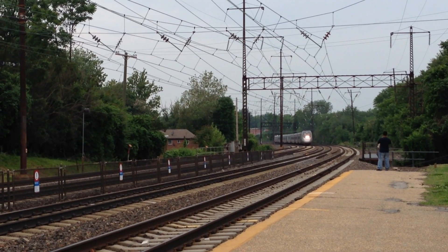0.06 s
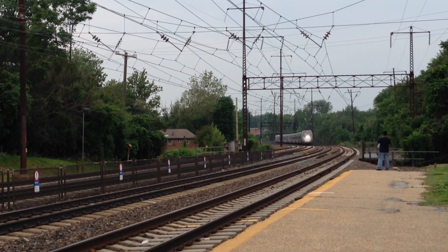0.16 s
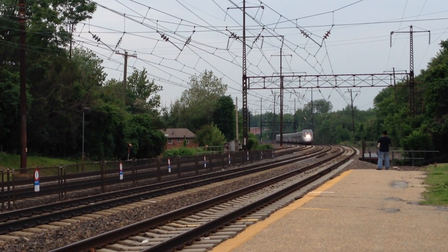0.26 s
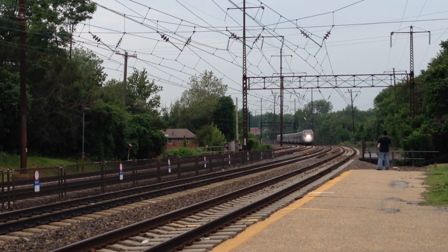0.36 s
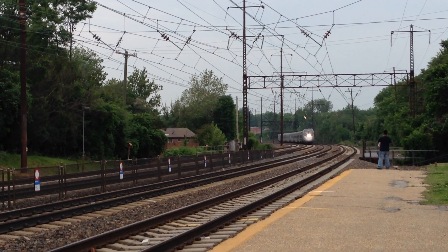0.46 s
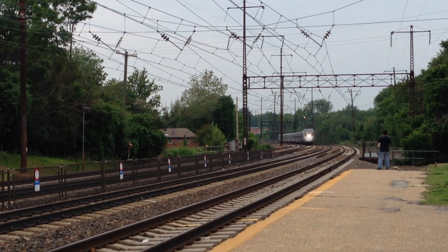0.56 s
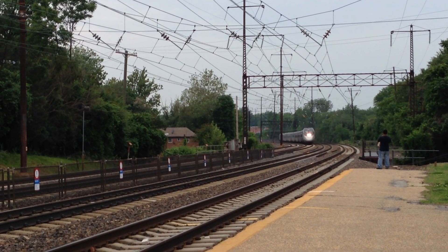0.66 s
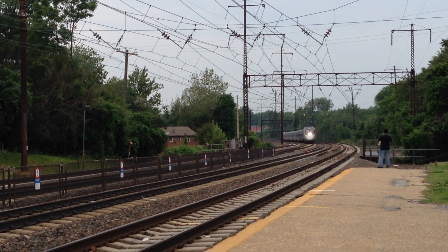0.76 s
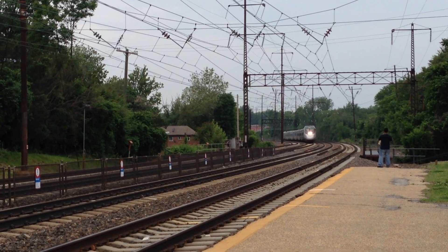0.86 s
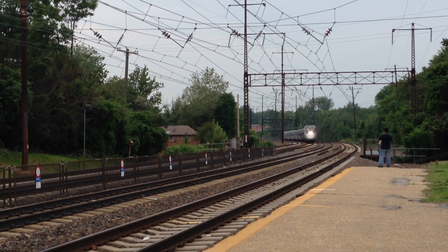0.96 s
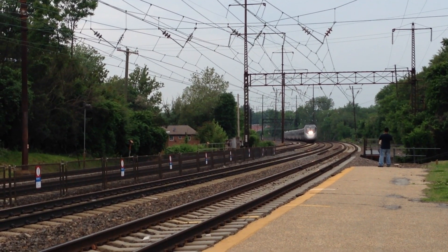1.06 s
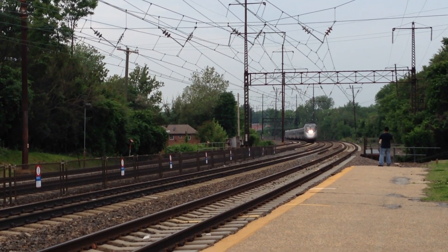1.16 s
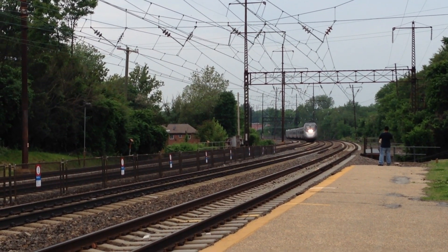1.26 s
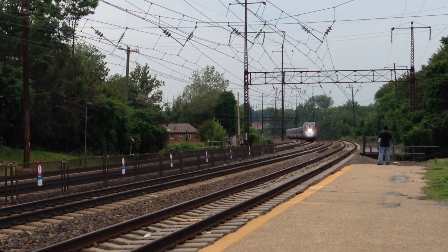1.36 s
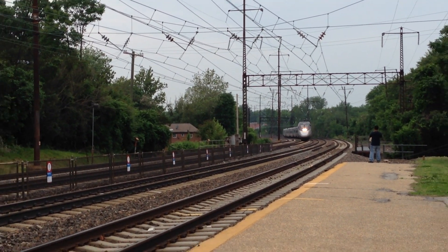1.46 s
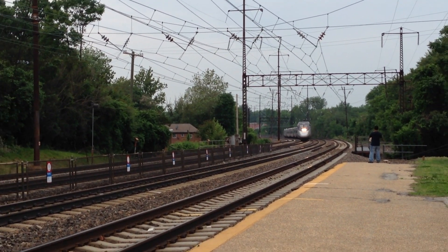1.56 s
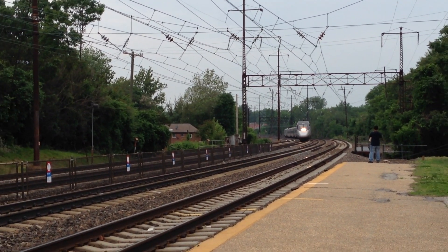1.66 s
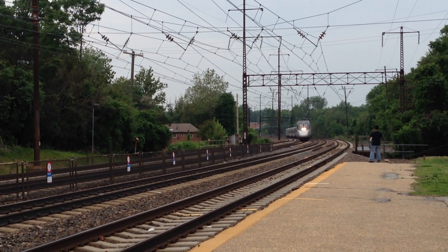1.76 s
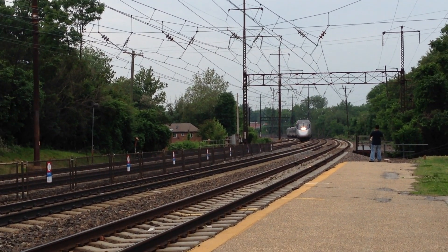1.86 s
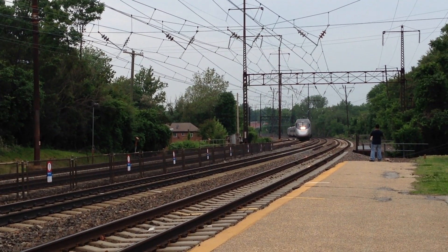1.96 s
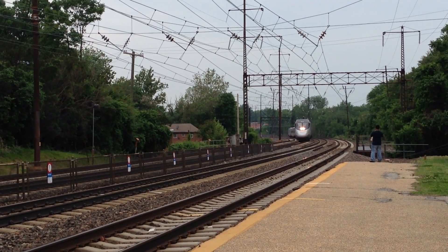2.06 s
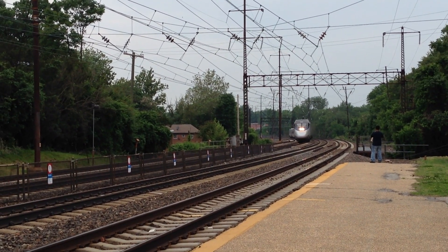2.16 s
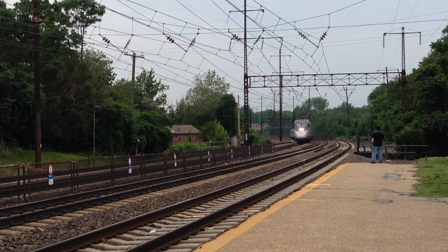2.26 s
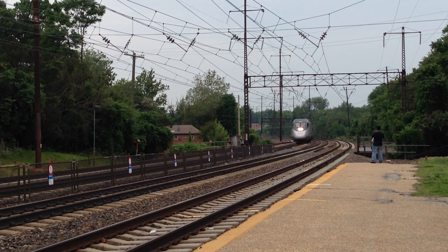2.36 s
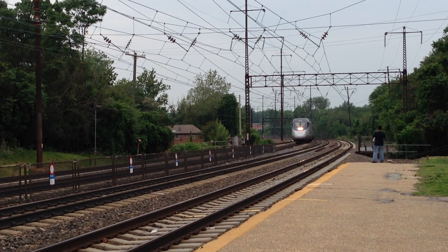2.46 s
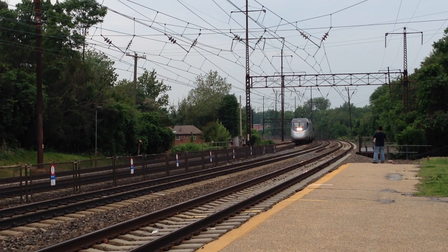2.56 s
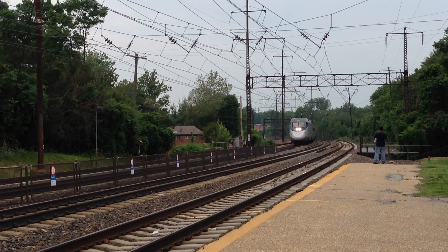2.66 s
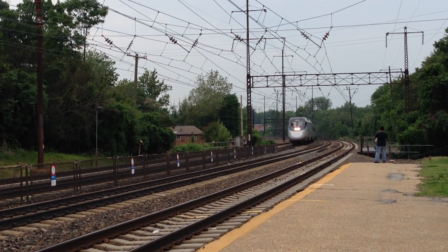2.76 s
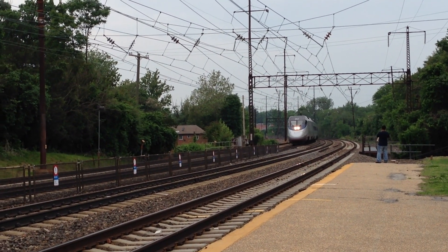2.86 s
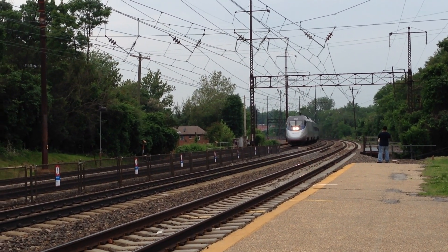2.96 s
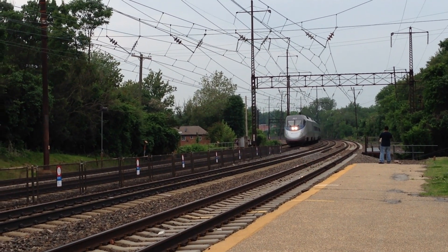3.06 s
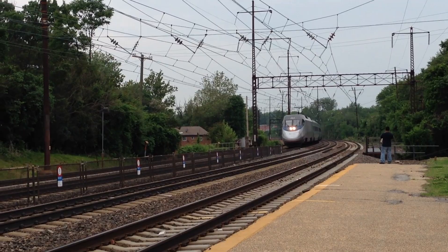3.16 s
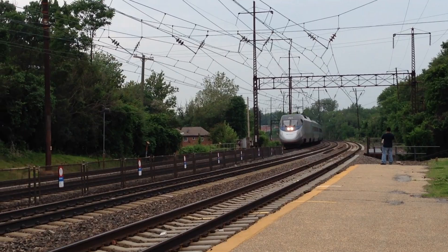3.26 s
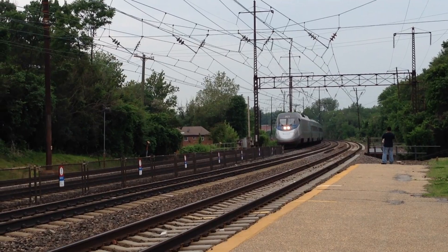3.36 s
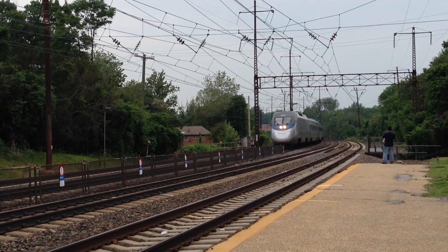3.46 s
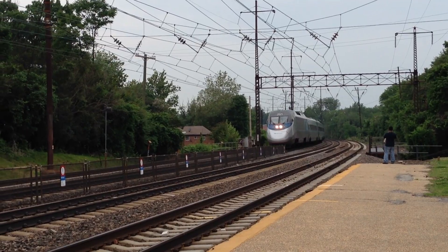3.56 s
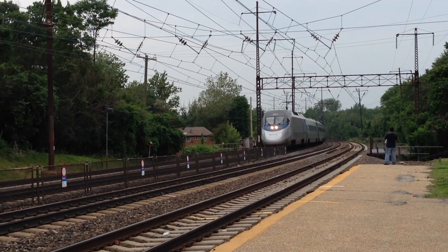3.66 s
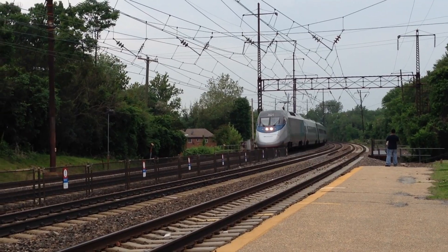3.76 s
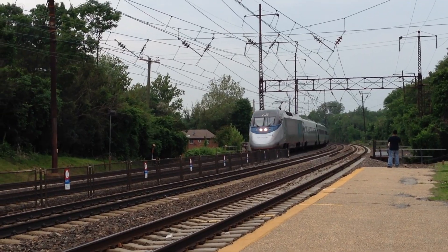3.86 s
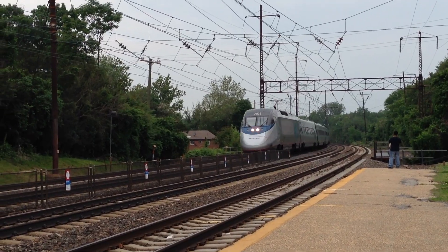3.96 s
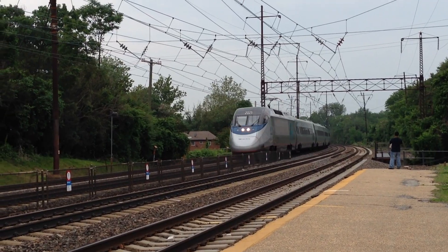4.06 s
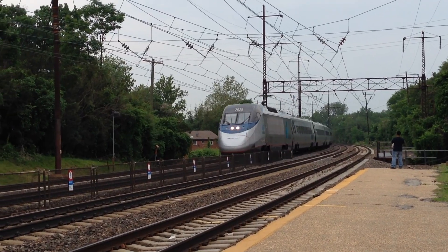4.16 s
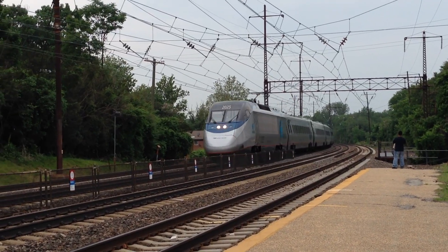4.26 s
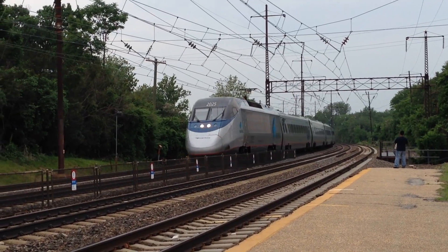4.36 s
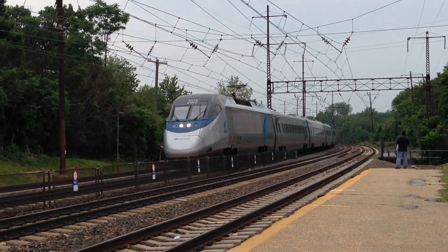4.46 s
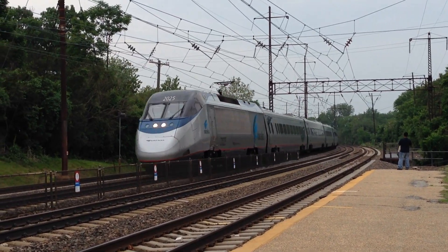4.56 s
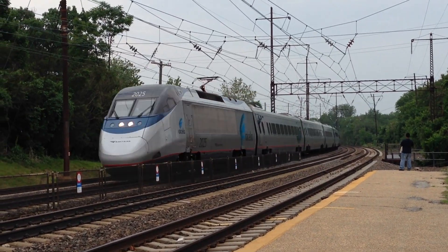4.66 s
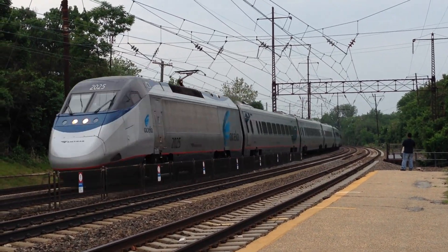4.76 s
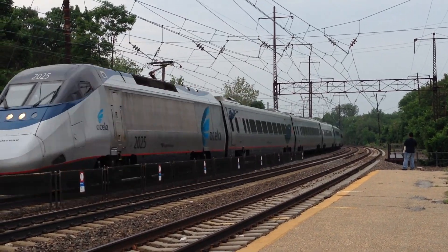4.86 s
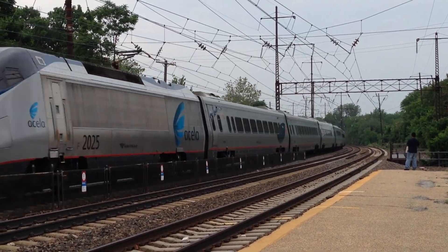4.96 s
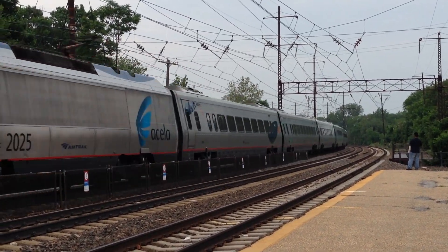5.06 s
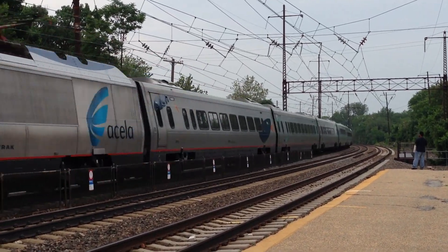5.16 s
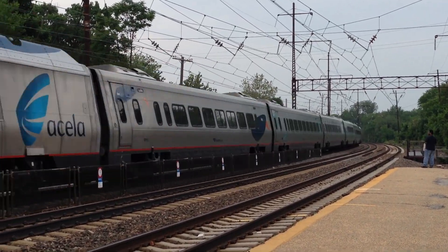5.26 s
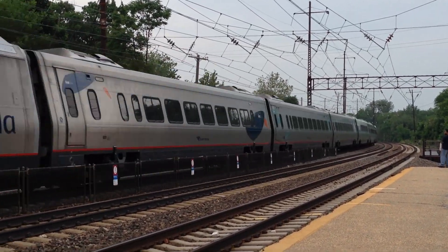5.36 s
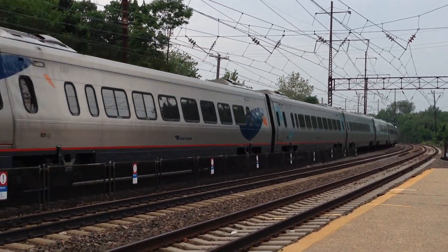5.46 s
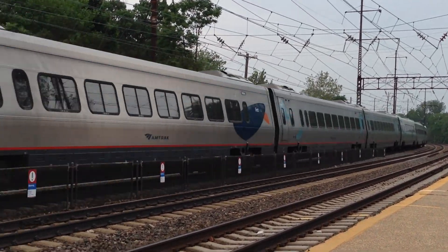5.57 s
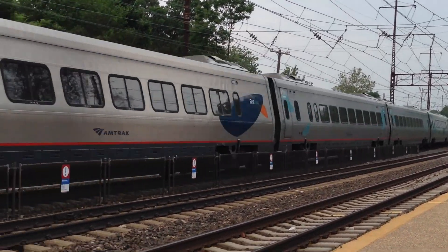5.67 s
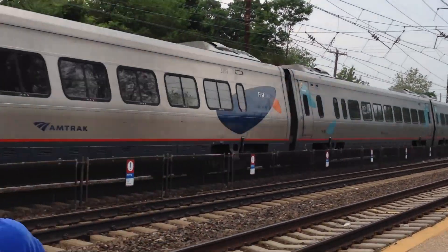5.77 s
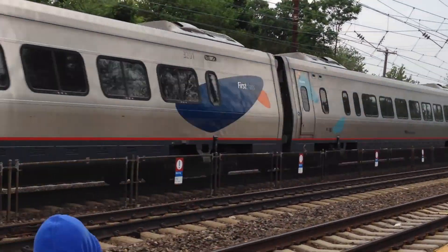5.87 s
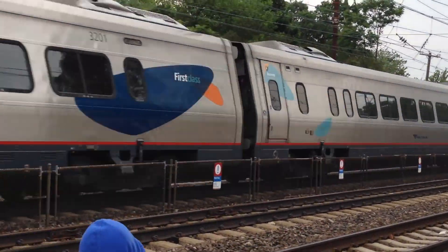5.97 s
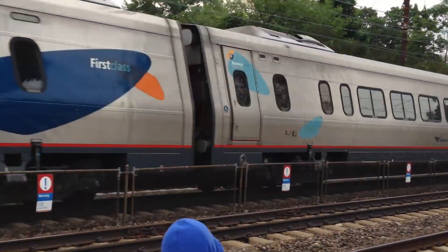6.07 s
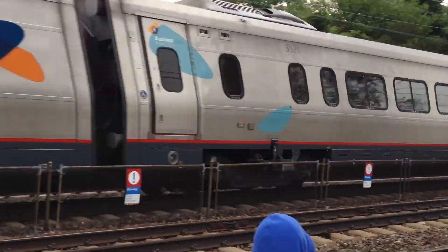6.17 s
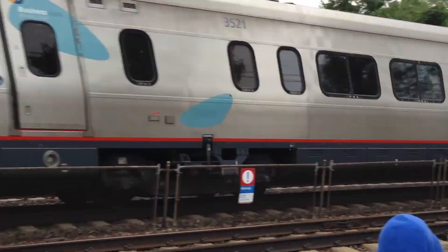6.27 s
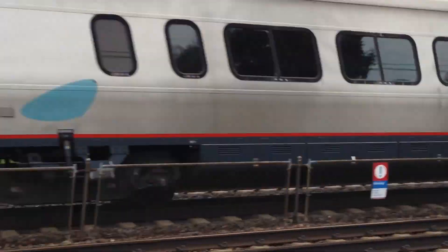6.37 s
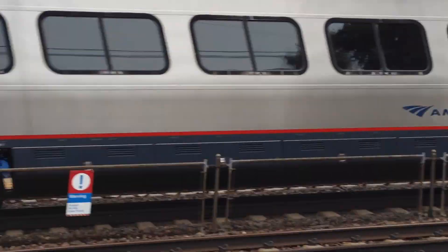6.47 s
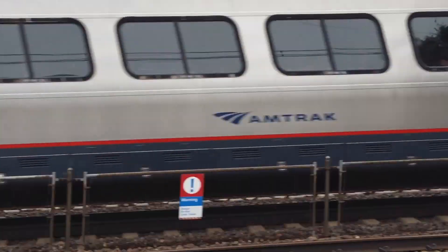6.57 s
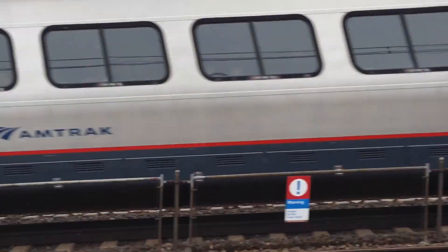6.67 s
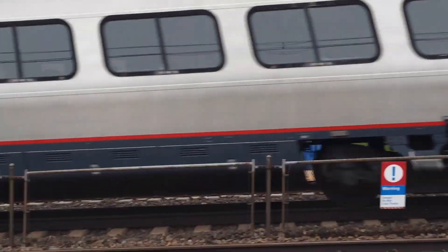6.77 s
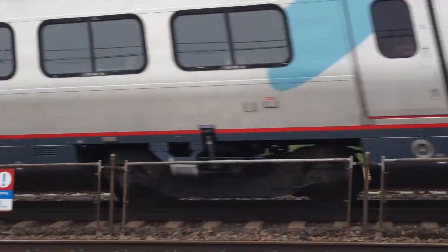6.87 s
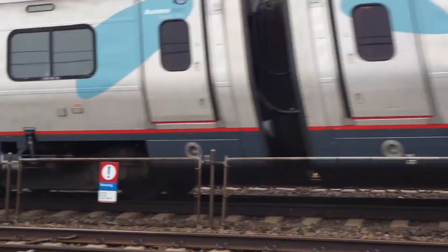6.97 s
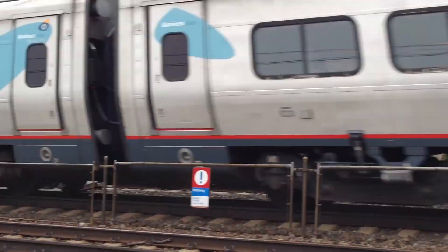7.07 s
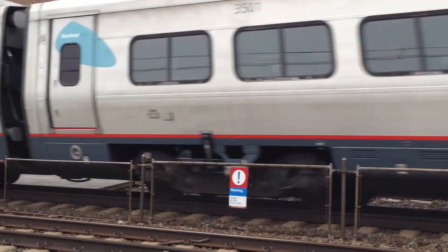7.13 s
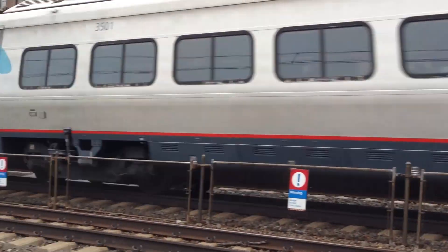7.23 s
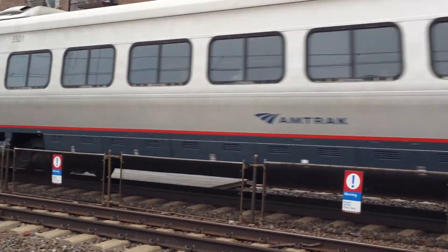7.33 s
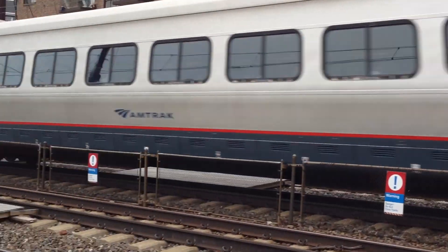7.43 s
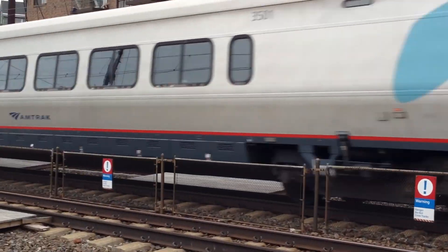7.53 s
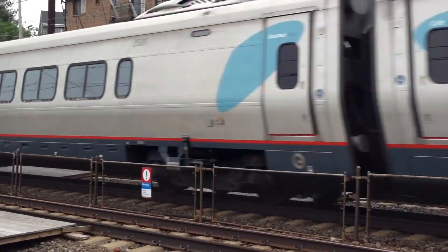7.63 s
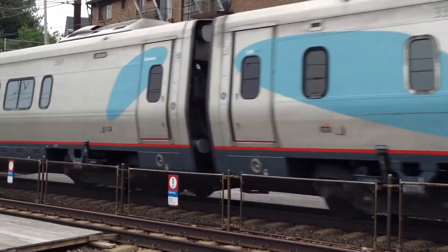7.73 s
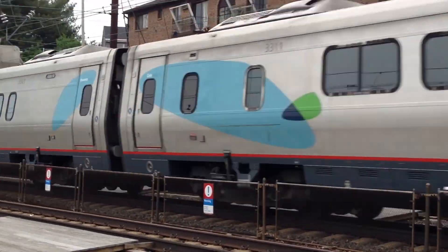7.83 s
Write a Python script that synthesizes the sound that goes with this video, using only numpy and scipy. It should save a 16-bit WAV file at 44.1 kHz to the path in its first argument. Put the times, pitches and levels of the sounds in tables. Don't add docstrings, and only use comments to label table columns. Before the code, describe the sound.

Outdoors on a railway platform, a very faint low rumble and a few husky sparrow chirps. From about three seconds the train swells, with thin rail singing and tiny electric spits. Near five seconds two very short brassy horn barks sound, then a loud broadband roar of wheels, motors and wind fills the close single microphone, pulsing as each wheel set passes until the end.

```python
import sys
import numpy as np
from scipy import signal
from scipy.fft import rfft, irfft, next_fast_len
from scipy.io import wavfile
from scipy.ndimage import uniform_filter1d, map_coordinates

SR = 44100
rng = np.random.default_rng(int(sys.argv[2]) if len(sys.argv) > 2 else 0)


def store_pcm(level_fs):
    pcm = np.round(np.clip(level_fs, -1, 1) * 32767).astype(np.int16)
    wavfile.write(sys.argv[1], SR, np.atleast_2d(pcm).T)


def makeup_ratio(level_db):
    decades = np.asarray(level_db, float) / 20
    return 10 ** decades


N = 348390
HOP = 256

# t/s, stage (0 far, 1 close ahead, 2 power car alongside, 3 coaches alongside)
NEARNESS = [
    (0, 0),
    (2.5, 0.58),
    (4.3, 1),
    (4.8, 1.3),
    (5.3, 2.5),
    (5.75, 2.5),
    (6.15, 3),
    (7.9, 3),
]
# t/s, level/dB
LOUDNESS = [(0, -48.5), (1, -48.5), (1.6, -48), (2.7, -44), (3.3, -40), (3.45, -40.5), (3.72, -36.5),
            (3.95, -37.5), (4.6, -31), (4.8, -27), (5.27, -23), (5.5, -19), (5.8, -22), (6.7, -21.5),
            (7.0, -20), (7.9, -22.5)]
# f/Hz, level/dB (per Hz)
RUMBLE = [
    [(12, -62), (20, -28), (48, -5), (70, 2), (98, -14), (150, -21), (200, -26), (330, -120)],
    [(12, -45), (20, -15), (51, 0), (70, -2), (103, -12), (150, -1), (200, -23), (330, -120)],
    [(12, -52), (20, -24), (70, -1), (108, -12), (150, -1), (200, -17), (330, -120)],
    [(12, -51), (20, -22), (70, 0), (86, 4), (108, -37), (150, -4), (200, 2), (330, -120)],
]
ROLLING = [
    [(71, -43), (120, -20), (205, -3), (345, -9), (414, -14), (558, -25.5), (588, -10), (644, -28), (688, -21.5), (904, -14), (1130, -22), (1830, -14.5), (2700, -28.5), (3510, -64), (5940, -120)],
    [(71, -41), (120, -11), (184, 3.5), (242, -8), (336, 0.5), (436, -10.5), (523, -14.5), (814, -1.5), (1200, -1), (1540, -6), (1920, -3.5), (2370, -9.5), (2700, -26), (3510, -52), (5940, -120)],
    [(71, -37), (120, -6.5), (252, -7.5), (378, 1.5), (636, -6.5), (1140, -3.5), (1250, -4.5), (1920, -12), (2700, -14), (3510, -49), (5940, -120)],
    [(71, -42), (120, -6), (168, 0.5), (252, -1.5), (425, -1.5), (644, -5), (1040, -0.5), (1580, -2.5), (2050, -2.5), (2430, -11.5), (2700, -11.5), (3510, -65), (5940, -120)],
]
HISS = [
    [(1530, -22), (2600, -24), (2860, 2.5), (5120, -4.5), (5660, -6.5), (6670, -16), (7300, -31), (9490, -42), (16100, -120)],
    [(1530, -19), (2600, -8), (3040, -3), (3690, -3), (4160, -6), (5140, -7.5), (7300, -14.5), (9490, -42), (16100, -120)],
    [(1440, -28), (2450, -8), (3360, 0.5), (3940, -1), (7300, -20), (9490, -43), (16100, -120)],
    [(1440, -51), (2450, -13.5), (2730, 4.5), (3040, 0.5), (5730, -3), (7300, -11), (9490, -30), (16100, -120)],
]
AIR = [
    [(5500, -60), (6800, -5), (8500, -9), (11000, -7), (11800, -2), (12600, 2), (14000, 1), (15200, -5)],
    [(4500, -48), (6800, -10), (8000, -3), (9000, 0), (11800, -6), (13800, -5), (15200, -18)],
    [(4000, -12), (6800, -3), (12700, -19), (15100, -29)],
    [(4000, -20), (6800, -2.5), (10200, -5.5), (14200, -14), (15100, -16)],
]
RUMBLE_DB = [-15.5, -16.5, -16.5, -15]
HISS_DB = [-17, -12.5, -9.5, -9.5]
AIR_DB = [-18.5, -22, -25.5, -16.5]
# t/s, swell/dB
BOGIES = [(5.55, 2), (6.07, 1), (6.37, 1.5), (6.57, 1.5), (6.92, 2), (7.17, 0), (7.4, 1.5), (7.77, 1)]
BOGIE_S, BOGIE_HISS, BOGIE_AIR = 0.048, 0.49, 0.33
# t/s, half length/s, level/dB
THUDS = [(1.52, 0.044, 13), (4.16, 0.087, 7), (4.5, 0.42, 6.5), (4.95, 0.11, 2.5), (5.28, 0.045, 8),
         (5.65, .1, 8), (5.92, 0.1, 5), (6.9, 0.35, 6.5), (7.15, .06, -5), (7.57, 0.055, 5),
         (7.81, 0.047, 12)]
# t/s, half length/s, level/dB
PUFFS = [(3.0, .05, -1), (3.3, .05, 2), (3.75, .12, 2), (4.15, 0.13, 5.5), (4.39, 0.086, 6.5),
         (5.19, 0.042, 0.5), (5.35, 0.06, 0), (5.85, .06, 3.5), (6.1, 0.14, -3), (6.47, 0.077, 1.5),
         (6.87, .08, 1.5)]

# f/Hz, delay on the first blast/s, level/dB in first blast, second blast and echo
BELLS = [
    (375, 0.09, -24, -20.5, -30.5),
    (461.6, 0.0024, -21, -20.5, -50),
    (580.5, 0.0066, -20.5, -19.5, -30.5),
    (624, -0.0071, -26, -36, -55),
    (538, 0.071, -30, -29.5, -47),
]
PARTIALS = [
    [-6, 2, -26, -10.5, -17, -19],
    [-11, 1, -11, -7, -11.5, -41],
    [-2, -4, -22, -24, -35, -30],
    [3, 3, 3.5, -19, -17, -29],
    [1, -1, -12, -19, -28, -25],
]
LEAN = [20, -30, 30, -170, 10]
# t/s, length/s, pitch factor, brassy top level/dB, rushing air level/dB
BLASTS = [
    (4.826, 0.069, 0.98, -17.5, -21.5),
    (4.978, 0.073, 0.98, -21.5, -26.5),
    (5.087, 0.11, 0.92, -60, -34),
]
# t/s, level/dB (per partial)
FACING = [(4.82, -1), (4.9, 3), (4.95, -2.2), (5.02, 0.7), (5.07, -0.5), (5.1, -3), (5.3, -9)]
# f/Hz, level/dB (per Hz)
BRASS = [
    [(1470, -14), (2500, 2), (3780, 2), (3870, 1), (4180, 1), (4980, 3), (7500, -19), (9750, -42), (16500, -120)],
    [(3820, -26), (6500, -5), (7330, -1), (8610, -5), (10900, -7.5), (15100, -22)],
]
# f/Hz, level/dB (per Hz)
THROAT = [(200, -46), (330, 0), (550, 1.5), (900, -0.5), (1300, -2), (1900, -1), (2400, -1), (2800, -45)]
ATTACK_S, RELEASE_T60, BRASS_T60 = 0.012, 0.22, 0.43
BUILD_DB, SPARKLE_DB = 7.5, -8.5
SAG_PER_S, SAG_POWER, MIDDLE_HZ = .21, 4, 475.6

# (t/s, length/s, f/Hz, level/dB)
SINGING = [
    (397, 0, 2, [(2.75, 0.44, 8900, -76), (3.1, 0.89, 8900, -65.5), (4.0, .9, 8860, -62)]),
    (160.4, 0.36, 3.2, [(5.28, 0.45, 1203, -26), (5.72, 0.25, 1030, -27)]),
    (648, .25, 3.5, [(5.15, 0.64, 3546, -35), (5.55, 0.31, 3300, -29.5)]),
    (238, .35, 4.6, [(5.66, 0.42, 1658, -26.5)]),
    (301, .15, 5.8, [(5.95, 0.14, 1980, -31), (6.28, .2, 2100, -27), (6.79, 0.48, 2105, -24.5), (7.15, 0.27, 2037, -26), (7.4, .24, 1890, -25), (7.56, .48, 1972, -26.5)]),
    (16, 0.038, 1.2, [(5.3, 1.9, 80, -37.5), (7.3, 0.86, 82.2, -36.5)]),
    (70, .1, 1.8, [(5.38, 0.3, 172.6, -30), (5.7, 0.24, 172, -33), (6.1, 0.39, 165.6, -34.5), (7.45, 0.18, 165, -31), (7.68, 0.14, 171.8, -31.5)]),
]
SWELL_SHARE = 0.15
# t/s, peak level/dB, t60/s
SPARKS = [
    (2.834, -48, .012),
    (3.745, -52, .08),
    (4.385, -41, .05),
    (5.804, -26, 0.25),
]
# t/s, f/Hz, level/dB
CHIRP = [(-.018, 6300, -20), (-.006, 5600, -3), (0, 4000, -18), (.008, 4600, 4), (.017, 5350, -4),
         (.046, 4450, -3), (.055, 3500, 0), (.083, 3280, -3.5), (.105, 3800, -16)]
# t/s, level/dB, pitch factor, length factor
SPARROW = [
    (.19, -60.5, 1.01, 1.01),
    (1.11, -56.5, 1.02, 0.92),
    (1.95, -55, 1.01, .9),
    (2.7, -57, 0.97, 1.07),
]

# t/s, level/dB
SPLITS = [(3.27, -73), (3.76, -56), (3.87, -65), (4.25, -56), (4.53, -57), (4.575, -60), (5.71, -47),
          (7.57, -35)]
# f/Hz, level/dB
SEAM = [(2560, -40), (2610, 0), (2710, 0), (2760, -40)]
# f/Hz, level/dB
LOW_CUT = [(15, -24), (30, -18), (45, 0.5), (65, 0)]


def train():
    rolling_db, near = curves(LOUDNESS)[0], curves(NEARNESS)[0]

    def layer_db(stages_db):
        return rolling_db + np.interp(near, np.arange(len(stages_db)), stages_db)

    axles = wobble(9.8) * (0.27 + 0.2 * near)
    bogies = swells([(s, BOGIE_S, db) for s, db in BOGIES])
    rumble_db = layer_db(RUMBLE_DB) + swells(THUDS)
    wheels_db = rolling_db + bogies + 0.26 * axles
    hiss_db = layer_db(HISS_DB) + BOGIE_HISS * bogies + 0.4 * axles
    air_db = layer_db(AIR_DB) + BOGIE_AIR * bogies + swells(PUFFS) + 0.22 * axles + 0.56 * wobble(23)
    return (makeup_ratio(rumble_db) * roar(RUMBLE, patchy_db=-0.8)
            + makeup_ratio(wheels_db) * roar(ROLLING, patchy_db=1.66)
            + makeup_ratio(hiss_db) * roar(HISS, patchy_db=1.5)
            + makeup_ratio(air_db) * roar(AIR, patchy_db=0.5))


def roar(spectra, patchy_db):
    sizes = dict(nperseg=4 * HOP, noverlap=3 * HOP)
    hz, t, z = signal.stft(rng.standard_normal(N + 4 * HOP), SR, **sizes)
    place = curves(NEARNESS, t)[0]
    share = np.clip(1 - np.abs(place - np.arange(len(spectra))[:, None]), 0, 1)
    gain = makeup_ratio(np.transpose([along(s, hz) for s in spectra]) @ share)
    gain = gain / np.sqrt(np.mean(gain ** 2, axis=0))
    patches = uniform_filter1d(rng.standard_normal(z.shape), size=7, axis=0)
    patches = unit(uniform_filter1d(patches, size=14, axis=1))
    return unit(signal.istft(z * gain * makeup_ratio(patchy_db * patches), **sizes)[1][:N])


def horn():
    first, t, on = span(FACING, .02)
    tones, fronts = bells(t)
    return gate(on * (tones + brassy_top(t, fronts) + rushing_air(t)), first)


def bells(t):
    tones, fronts = np.zeros(len(t)), np.zeros(len(t))
    starts, lengths, factors, *_ = np.transpose(BLASTS)
    which = np.maximum(np.searchsorted(starts, t) - 1, 0)
    doppler = uniform_filter1d(factors[which], size=500)
    since = uniform_filter1d(t - starts[which], size=500)
    tilt_db = curves(FACING, t)[0]
    for (hz, late, *levels_db), partials, lean in zip(BELLS, PARTIALS, LEAN):
        blows = []
        for s, d, db in zip(starts + [late, 0, 0], lengths, levels_db):
            lean_db = lean * np.clip(t - s - d / 2, -.05, .05)
            blows.append(makeup_ratio(db + lean_db) * blast(t, s, d))
        level = np.max(blows, axis=0)
        sag = 1 - SAG_PER_S * (hz / MIDDLE_HZ) ** SAG_POWER * since
        shake = 1 + .013 * wobble(70, len(t))
        phase = 2 * np.pi * np.cumsum(hz * doppler * sag * shake) / SR
        for k, part_db in enumerate(partials, 1):
            flutter_db = 2.8 * wobble(55, len(t))
            part = makeup_ratio(part_db + (k - 2.5) * tilt_db + flutter_db)
            tones += level * part * np.sin(k * phase + k * k)
        fronts += level * signal.sawtooth(phase)
    return tones, fronts


def brassy_top(t, fronts):
    blows = []
    for s, d, _, db, _ in BLASTS:
        build_db = -BUILD_DB * np.clip(1 - (t - s) / d, 0, 1)
        blows.append(makeup_ratio(db + build_db) * blast(t, s, d, BRASS_T60))
    edge = np.gradient(fronts)
    edge = edge / np.sqrt(np.abs(uniform_filter1d(edge ** 2, size=900)) + 1e-12)
    buzz = edge + 1.5 * rng.standard_normal(len(t))
    brass, sparkle = (unit(coloured(buzz, s)) for s in BRASS)
    return makeup_ratio(-8.5) * np.max(blows, axis=0) * (brass + makeup_ratio(SPARKLE_DB) * sparkle)


def rushing_air(t):
    level = np.max([makeup_ratio(db) * blast(t, s, d) for s, d, _, _, db in BLASTS], axis=0)
    return level * unit(coloured(rng.standard_normal(len(t)), THROAT))


def blast(t, s, length, t60=RELEASE_T60):
    return np.clip((t - s) / ATTACK_S, 0, 1) * makeup_ratio(-60 * np.clip(t - s - length, 0, None) / t60)


def singing():
    out = np.zeros(N)
    for width_hz, slide, burst_db, rows in SINGING:
        for s, length, start_hz, db in rows:
            first, t, _ = span([(s,), (s + length,)], 0.000992)
            on = np.clip(np.minimum(t - s, s + length - t) / (SWELL_SHARE * length), 0, 1) ** 2
            keep = np.exp(-np.pi * width_hz / SR)
            drive = rng.standard_normal((len(t), 2)) @ [1, 1j]
            fuzz = signal.lfilter([1], np.poly([keep, keep]), drive)
            stray = .35 * width_hz * np.tanh(3 * wobble(45, len(t)))
            bursts = makeup_ratio(burst_db * wobble(70.1, len(t)))
            hz = start_hz * (1 - slide * (t - s)) + stray
            carrier = np.exp(2j * np.pi * np.cumsum(hz) / SR)
            out += gate(on * makeup_ratio(db + 3.5) * np.real(unit(fuzz * bursts) * carrier), first)
    return out


def sparks():
    out, t = np.zeros(N), np.arange(SR // 8) / SR
    for s, db, t60 in SPARKS:
        out[round(s * SR):][:len(t)] += makeup_ratio(db - 60 * t / t60) * rng.standard_normal(len(t))
    return coloured(out, [(2500, -30), (4500, 3), (7000, -1), (12000, -6), (15000, -12)])


def sparrow():
    out = np.zeros(N)
    for s, level_db, pitch, length in SPARROW:
        rows = [(s + length * t, pitch * hz, db) for t, hz, db in CHIRP]
        first, t, on = span(rows, 0.0054)
        hz, db = curves(rows, t)
        husk = 1 + .8 * wobble(500, len(t))
        wavering_hz = hz + 120 * wobble(159, len(t))
        tone = np.sin(2 * np.pi * np.cumsum(wavering_hz) / SR)
        out += gate(on * makeup_ratio(level_db + db) * husk * tone, first)
    return out


def platform(x, t60, wet_db):
    t = np.arange(SR // 2) / SR
    tail = uniform_filter1d(rng.standard_normal(len(t)), size=5) * makeup_ratio(-60 * t / t60) * (t > .012)
    return x + makeup_ratio(wet_db) * signal.fftconvolve(x, tail / np.linalg.norm(tail))[:N]


def unit(x):
    return x / np.sqrt(np.mean(np.abs(x) ** 2) + 1e-20)


def along(points, hz):
    f, v = np.transpose(points)
    return np.interp(np.log(hz + 1), np.log(f + 1), v)


def curves(rows, t=None):
    s, *cols = np.transpose(rows)
    return [np.interp(np.arange(N) / SR if t is None else t, s, c) for c in cols]


def gate(x, first):
    return np.pad(x, (first, N))[:N]


def span(rows, fade):
    end = rows[-1][0] + fade
    first = round((rows[0][0] - fade) * SR)
    t = np.arange(first, min(N, round(end * SR))) / SR
    return first, t, np.clip(np.minimum(t - t[0], end - t) / fade, 0, 1)


def wobble(rate, size=N):
    knots = rng.standard_normal(400)
    return map_coordinates(knots, [np.arange(size) * rate / SR], mode="wrap", order=1 + (rate < 20))


def swells(rows):
    t = np.arange(N) / SR
    return sum(db * np.exp(-((t - s) / half) ** 2) for s, half, db in rows)


def coloured(x, spectrum):
    m = next_fast_len(len(x) + SR // 4)
    return irfft(rfft(x, m) * makeup_ratio(along(spectrum, np.fft.rfftfreq(m, 1 / SR))), m)[:len(x)]


def scene():
    blasts = platform(horn(), t60=.25, wet_db=-12)
    bird = platform(sparrow(), t60=.15, wet_db=-7)
    mono = train() + blasts + singing() + sparks() + bird
    return np.array([mono, mono])


def top_cut(x):
    return signal.sosfilt(signal.butter(12, 15220, fs=SR, output="sos"), x)


def record(dry):
    t = np.arange(0, N, HOP) / SR
    split = sum(makeup_ratio(db) * np.exp(-((t - s) / 0.015) ** 2) for s, db in SPLITS)
    treble = [(2900, -90), (3400, -8), (7000, 13), (10000, -19), (13000, -40)]
    grit = np.repeat(split, HOP)[:N] * unit(coloured(rng.standard_normal(N), treble))
    before_horn = np.arange(N) < 4.8 * SR
    seam = np.clip(.65 + .4 * wobble(8), 0, 1) * before_horn
    mono = coloured(dry[0], LOW_CUT) - seam * coloured(dry[0], SEAM)
    mono = mono / (1 + np.abs(mono / .56) ** 5) ** .2
    return top_cut(np.array([mono + grit, mono - grit]))


dry = scene()
out = record(dry)
store_pcm(out)
```